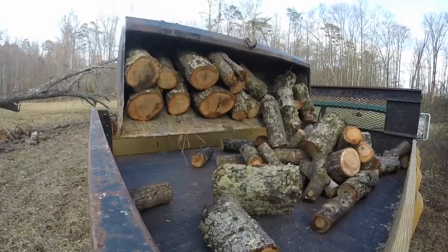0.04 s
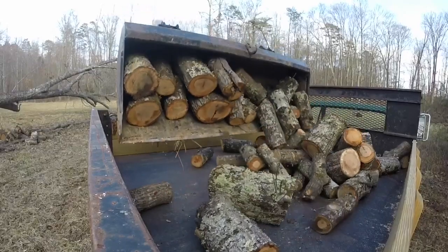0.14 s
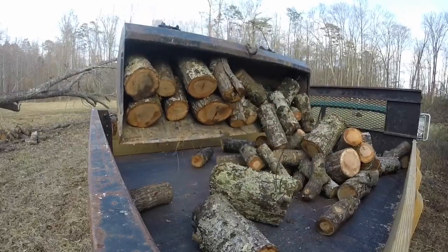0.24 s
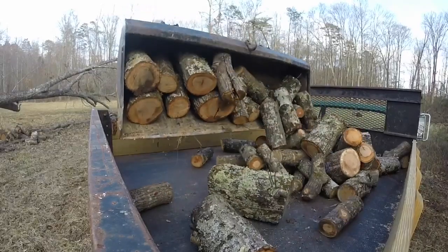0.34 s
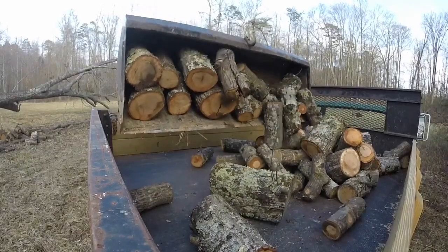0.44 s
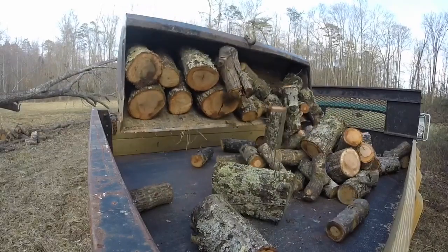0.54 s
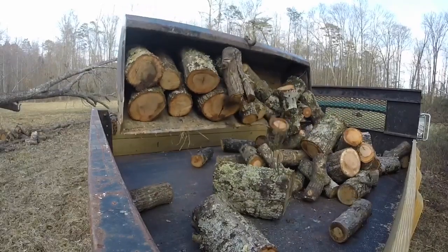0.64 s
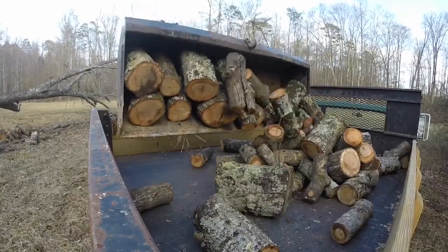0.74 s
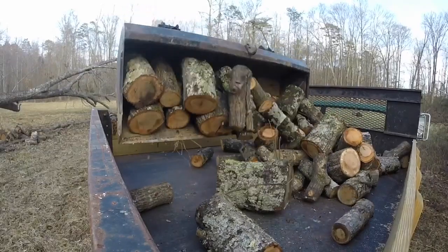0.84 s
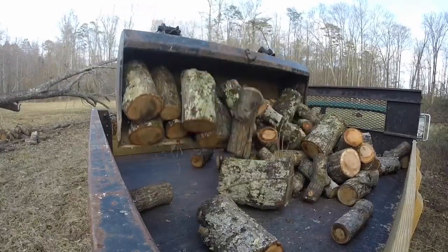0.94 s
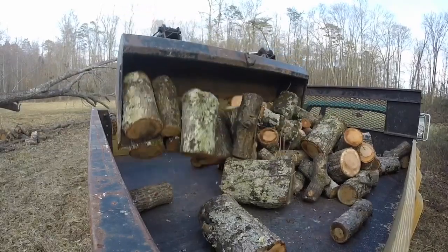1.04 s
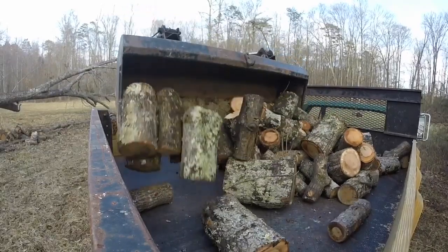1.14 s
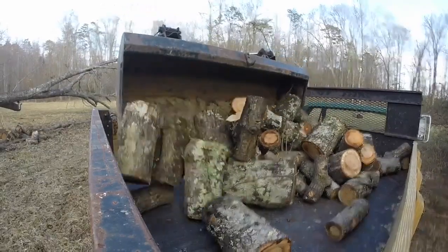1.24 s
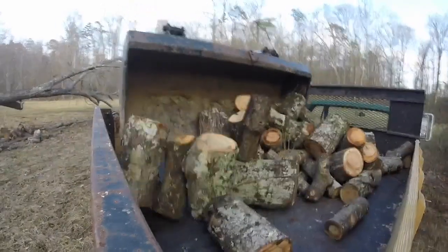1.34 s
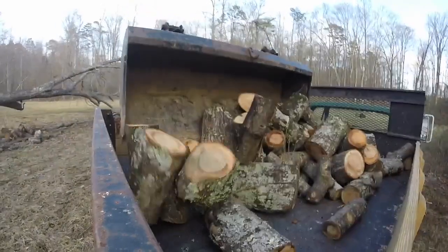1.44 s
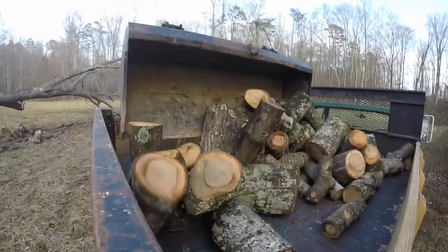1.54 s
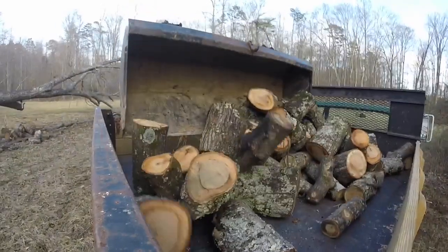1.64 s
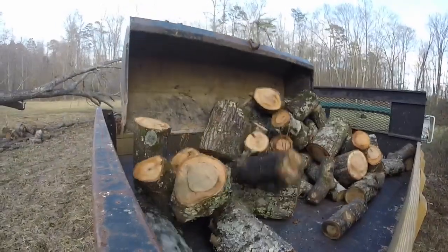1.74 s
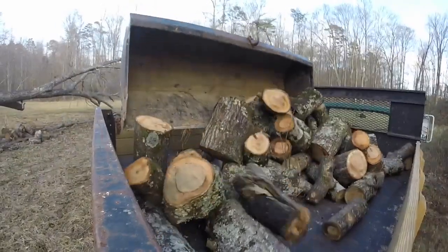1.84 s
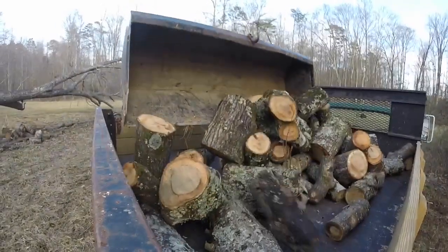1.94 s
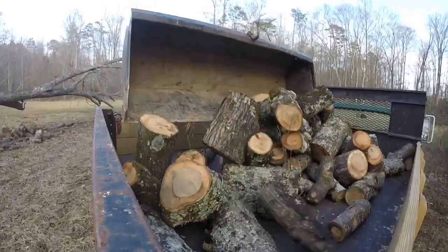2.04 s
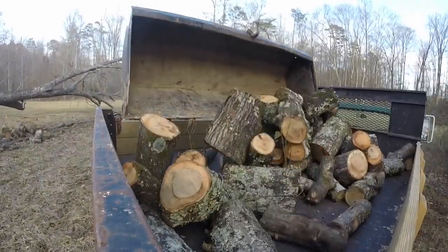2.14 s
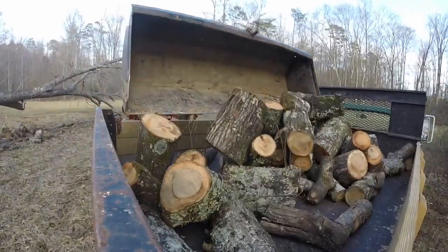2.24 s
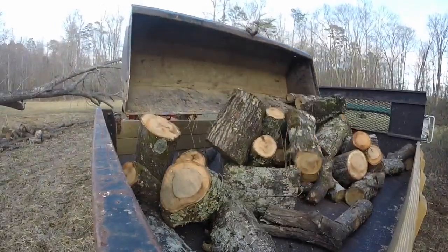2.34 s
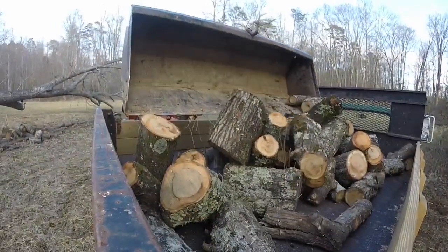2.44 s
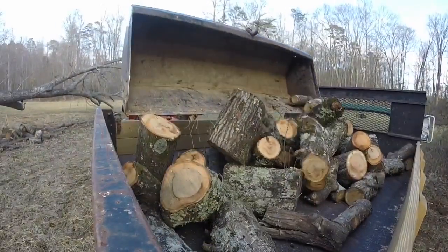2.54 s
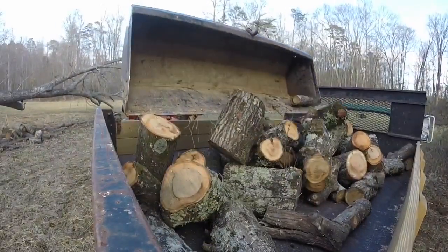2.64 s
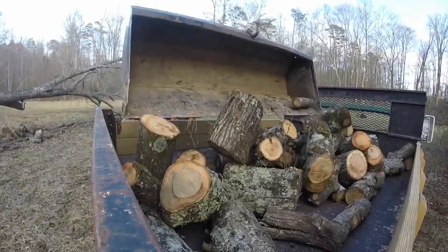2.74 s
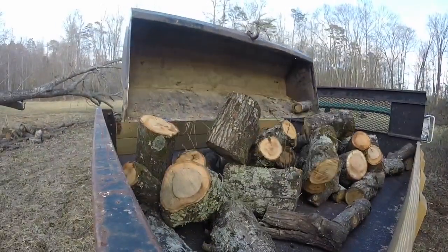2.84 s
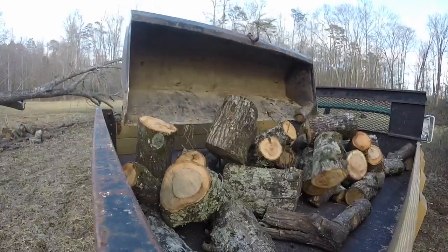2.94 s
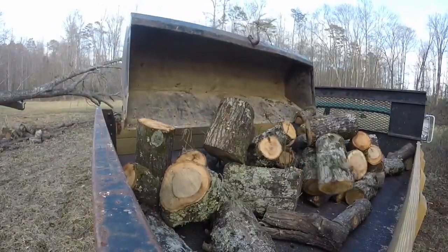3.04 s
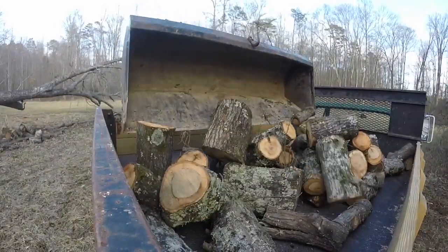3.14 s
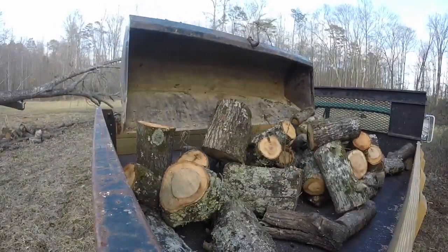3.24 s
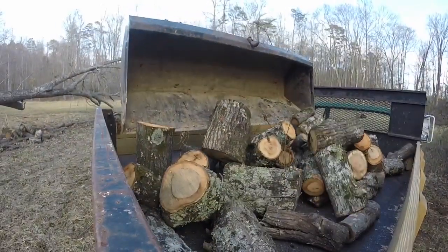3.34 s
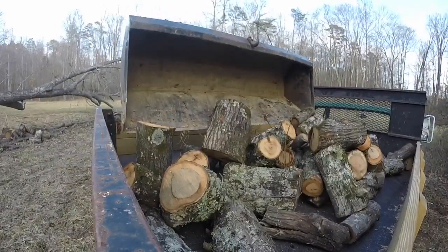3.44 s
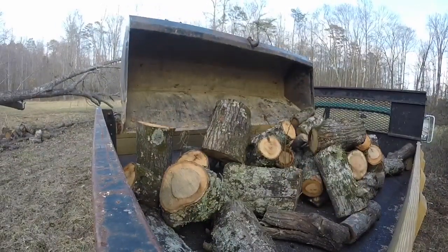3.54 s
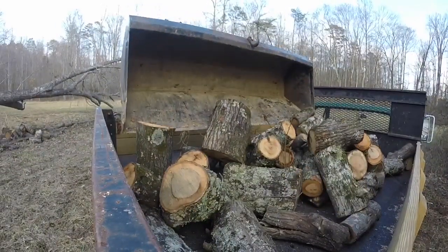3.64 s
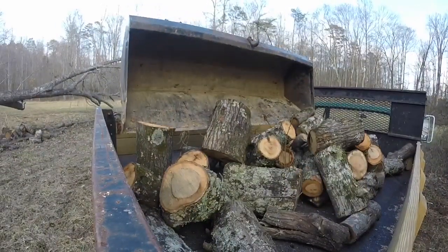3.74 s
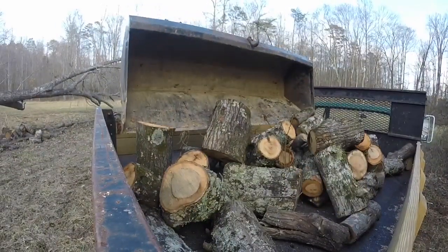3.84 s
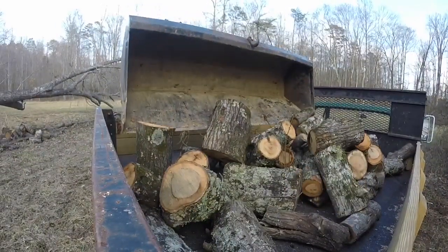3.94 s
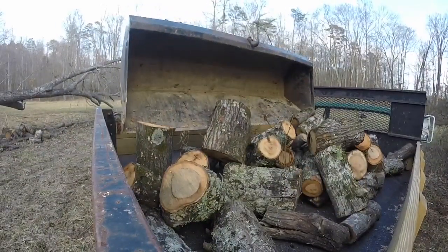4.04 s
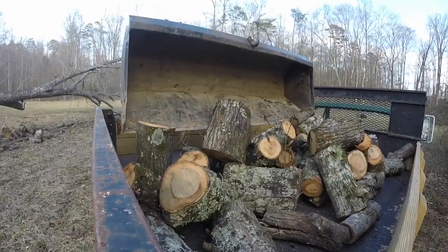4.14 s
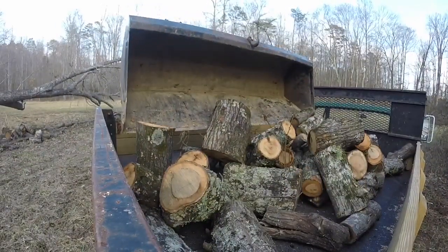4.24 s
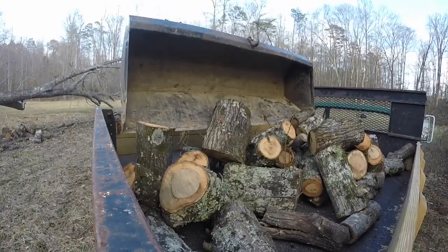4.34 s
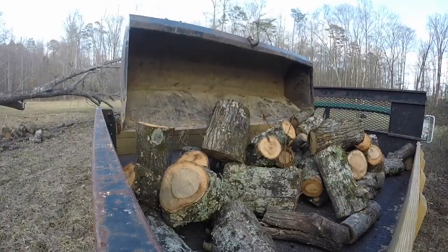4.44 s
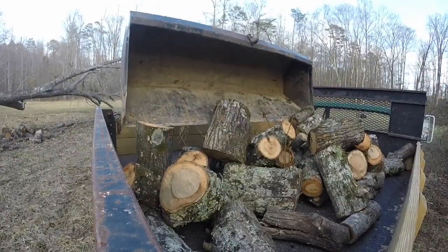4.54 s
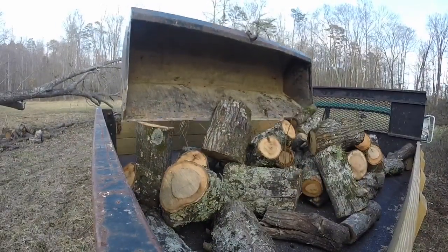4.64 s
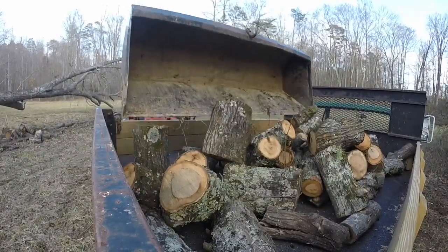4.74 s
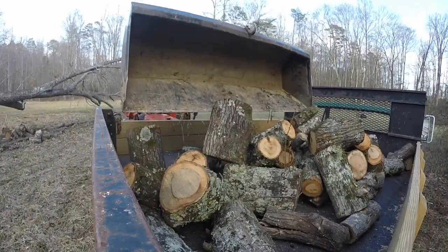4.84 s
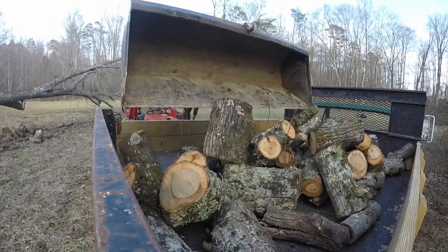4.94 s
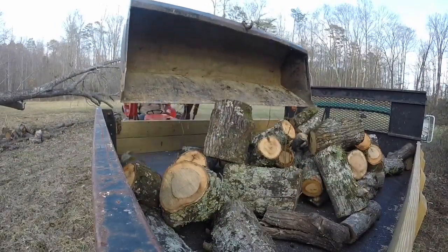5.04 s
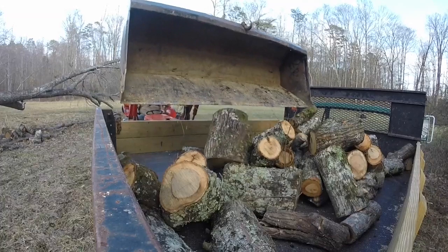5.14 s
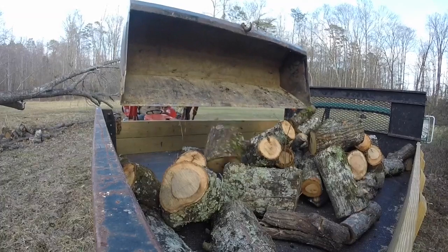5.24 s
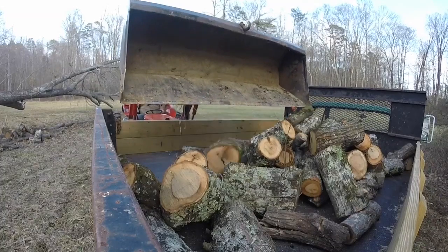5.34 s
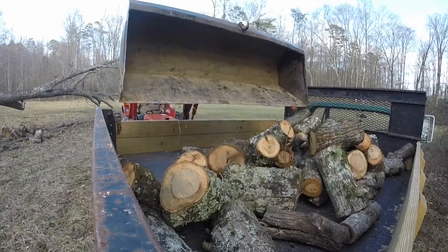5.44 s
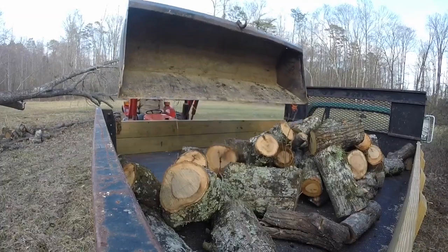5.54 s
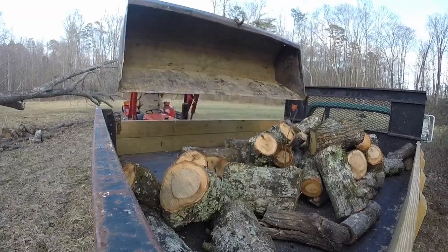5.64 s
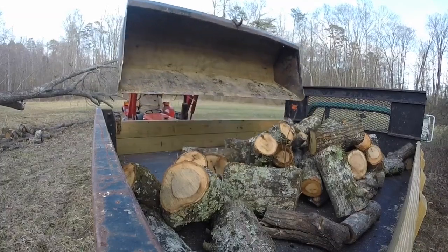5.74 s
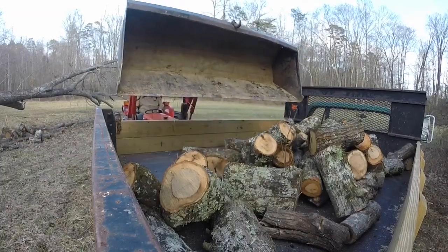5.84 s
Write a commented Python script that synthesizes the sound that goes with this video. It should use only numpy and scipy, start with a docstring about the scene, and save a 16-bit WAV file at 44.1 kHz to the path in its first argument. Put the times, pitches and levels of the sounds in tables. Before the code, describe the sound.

Firewood logs tumble from a steel loader bucket into a truck bed with heavy thuds, woody knocks and metallic booms over an idling diesel tractor.

```python
"""Firewood tipped into a truck bed

A tractor tips a loader bucket of firewood logs into a truck bed while its diesel runs throughout.
Logs thud on the bed and knock together, made from ringing tones and bursts of filtered noise.
The steel bucket booms and clanks; many small random contacts make the rumble, rattle and rustle.
The tractor is a stack of exhaust tones with noise for its clatter and hiss; a few last logs topple late."""
import sys
import numpy as np
from scipy import signal
from scipy.fft import rfft, irfft
from scipy.io import wavfile

SR = 44100
rng = np.random.default_rng(int(sys.argv[2]) if len(sys.argv) > 2 else 0)


def put_to_file(sound):
    """Save the sound as 16-bit audio at rate SR, in the file named by the first command-line argument."""
    columns = np.atleast_2d(sound).T  # one column per channel
    safe = np.clip(columns, -1, 1)
    whole_steps = np.round(safe * 32767)
    wavfile.write(sys.argv[1], SR, whole_steps.astype(np.int16))


N = 259308

# logs landing, mostly on the bed, a few inside the bucket; levels before the trims below: # start_s, thump_db,
# plank_crash_db, side_wall_shake_db, t60_s (time to fade by 60 dB)
LANDINGS = [(.013, -15, -20, -50, 0.23), (0.035, -12.5, -23, -45, .1), (.263, -14, -15.5, -59, 0.17),
            (.715, -12.5, -22.5, -53, .3), (.745, -21, -21, -50, 0.1), (.839, -7, -16.5, -65, 0.38),
            (.934, -9.5, -26.5, -60, 0.43), (1.247, -7, -12, -41, 0.22), (1.275, -7, -11.5, -15.5, 0.13),
            (1.367, -7, -11, -14, 0.2), (1.616, -12.5, -33, -40, 0.078), (1.68, -24, -23, -20.5, 0.18),
            (1.786, -6, -5, -24, 0.063), (2.015, -9.5, -13.5, -32, 0.1), (2.168, -9, -9, -23, 0.15),
            (2.654, -13, -40, -64, 0.12), (2.759, -13.5, -49, -65, 0.19), (2.844, -11.5, -31, -55, 0.25),
            (3.222, -7, -10.5, -21.5, .13), (5.075, -4.5, -21, -16, .18), (5.102, -9, -5, -15, 0.13),
            (5.363, -11.5, -17.5, -22.5, 0.26), (5.551, -9, -22.5, -28, 0.22), (5.664, -6, -18, -15, 0.15)]
# ringing tones of the bed's floor: pitch_hz, level_db
BED_MODES = [(58, -9.5), (84, 0), (108, -1.5), (135, -1), (166, -4.5), (200, -4.5), (252, -11), (325, -6.5),
             (431, -12.5)]
# colour of the crashing planks: frequency_hz, level_db (per Hz)
CRASH_COLOUR = [(100, -1.5), (300, 13.5), (450, 4.5), (600, 3.5), (850, 2.5), (1200, -5), (1600, -1.5),
                (2100, -10), (3500, -22), (7000, -39), (14000, -79)]


def thuds(thump_db=-5.0, crash_db=0.0, punch_db=2.5, punch_t60=0.041, lowest_hz=55):
    """A landing log pushes the floor's low modes; the planks answer with a punch and a longer crash."""
    times, low_db, plank_db, _, t60s = np.transpose(LANDINGS)
    crash_noise = coloured(rng.standard_normal(N), CRASH_COLOUR)
    crash = crash_noise * after_blows(times, plank_db + crash_db, t60s, rise_s=0.0045)
    punch_colour = [(130, 20.0), (300, -5), (600, -8.5), (1300, -7.0), (2000, -34), (5000, -52)]
    punch_noise = coloured(rng.standard_normal(N), punch_colour)
    punch = punch_noise * after_blows(times, plank_db + punch_db, punch_t60, rise_s=0.0023)
    out = crash + punch
    for s, db, t60 in zip(times, low_db, t60s):
        # the load lying on the floor detunes it from blow to blow
        modes = [(hz * (1 + 0.029 * rng.standard_normal()), mode_db, t60) for hz, mode_db in BED_MODES]
        add(out, s, from_db(db + thump_db) * struck(modes, rise_s=0.0016, scatter_db=3.5))
    # the thuds carry little deep bass
    return signal.sosfilt(signal.butter(2, lowest_hz, "high", fs=SR, output="sos"), out)


# log against log, levels before the trims below: start_s, level_db, pitch_hz, t60_s
KNOCKS = [(.013, -12.5, 1690, 0.11), (.066, -22, 1766, 0.13), (.119, -18, 1628, 0.09),
          (.266, -27, 1246, .14), (.351, -25, 1720, 0.071), (.591, -16.5, 861, 0.13),
          (.612, -18.5, 1045, .16), (.655, -21, 970, .1), (.75, -16.5, 2013, .13), (.853, -20, 1430, 0.072),
          (.995, -15.5, 1166, 0.066), (1.054, -12, 737, 0.11), (1.126, -17.5, 724, 0.12),
          (1.274, -7, 800, 0.06), (1.369, -13, 1326, .1), (1.674, -11, 1320, 0.043),
          (1.698, -12, 1566, 0.16), (1.786, -6, 1260, 0.027), (2.174, -14, 1167, .08),
          (2.332, -22, 1083, 0.13), (2.497, -28, 1194, .04), (2.658, -28, 1345, 0.11),
          (2.687, -25, 1013, 0.13), (2.782, -23.5, 1590, .15), (2.799, -21.5, 750, .16),
          (2.875, -28, 1560, .08), (3.194, -15.5, 1617, 0.081), (3.251, -15.5, 1600, .17),
          (3.477, -29, 964, 0.025), (3.934, -20.5, 1560, 0.039), (5.697, -13.5, 1498, 0.15)]
# ringing tones of a short log: pitch_ratio (multiple of its pitch), level_db
LOG_MODES = [(0.582, -5), (.81, -22.5), (0.999, 1.5), (1.17, -3.5), (1.432, -20), (1.848, -24), (2.3, -18),
             (2.9, -22.5)]
# the log's other end strikes a moment later, more softly
REBOUND_S, REBOUND_LOSS_DB = 0.024, 10.5


def knocks(wood_db=-5.5, bark_db=-5.0):
    """Each log strikes and rebounds, ringing briefly at its own pitch while its bark crunches."""
    rebounds = [(s + REBOUND_S, db - REBOUND_LOSS_DB, hz, t60) for s, db, hz, t60 in KNOCKS]
    touches = list(KNOCKS) + rebounds
    times, levels_db, _, t60s = np.transpose(touches)
    bark_colour = [(400, 13.5), (1700, 11.0), (2300, 1.0), (3200, -3), (5000, -21), (9000, -37)]
    bark = coloured(rng.standard_normal(N), bark_colour)
    out = bark * after_blows(times, levels_db + bark_db, t60s, rise_s=0.00043)
    for s, db, hz, t60 in touches:
        # higher tones fade sooner
        modes = [(hz * ratio, mode_db, t60 / ratio ** 0.5) for ratio, mode_db in LOG_MODES]
        add(out, s, from_db(db + wood_db) * struck(modes, rise_s=0.0004, scatter_db=1.0))
    return out


# heavy blows that set the bucket's shell booming, cut short where logs lean on it;
# levels before the trims below: start_s, level_db, t60_s, pitch_hz
BOOMS = [(.032, -14, 0.21, 107.6), (.189, -19, 0.44, 115.5), (0.503, -26, 0.19, 127),
         (.86, -13, .22, 116.3), (.936, -3, 0.44, 119.2), (1.03, -5, 0.32, 127), (1.072, -11, 0.36, 84.3),
         (1.19, -17, 0.14, 120), (1.278, -16, .28, 118.6), (2.18, -25.5, 1.8, 117.3),
         (2.385, -21.5, 1.3, 115), (2.98, -18, 0.53, 124), (3.033, -15.5, .67, 123.6),
         (3.228, -6, 0.2, 126.7), (3.313, -16.5, 0.24, 129.3), (4.55, -12.5, 0.41, 122.5),
         (4.598, -12, 0.96, 123.6), (4.801, -26, 1.15, 124)]
# deep tones of the shell: pitch_ratio (multiple of its pitch), level_db
SHELL_MODES = [(0.662, -10.5), (0.799, -10), (1.001, -1), (1.101, -8.5)]
# higher tones of the shell: pitch_ratio (multiple of its pitch), level_db
SHELL_OVERTONES = [(1.361, -9.5), (1.462, -1), (1.599, -14), (2.06, -25.5), (2.6, -16), (2.85, -20.5)]
# heavier logs land on a broader face, so the overtones lag behind the deep modes
OVERTONE_DB, OVERTONE_DB_PER_DB = -8, 0.5


def booms(boom_db=1.0):
    """Heavy blows make the bucket's whole shell boom; the heavier the blow, the deeper it sounds."""
    out = np.zeros(N)
    for s, db, t60, hz in BOOMS:
        overtone_db = OVERTONE_DB + OVERTONE_DB_PER_DB * db
        for modes, level_db in ((SHELL_MODES, db), (SHELL_OVERTONES, overtone_db)):
            for ratio, mode_db in modes:
                # logs and joints jostle against the shell, so each mode wavers
                mode = struck([(hz * ratio, mode_db, t60)], rise_s=0.0035, scatter_db=2.0)
                wavering = mode * waver(SR, per_s=30, spread_db=3.0)
                add(out, s, from_db(level_db + boom_db) * wavering)
    return out


# hard blows on the bucket's steel, ring level before the trims below: start_s, ring_db, crack_db
CLANKS = [(.266, -23, -29), (.752, -15, -21), (0.992, -19.5, -45), (1.367, -36, -16), (2.937, -19, -60),
          (3.195, -8.5, -17), (4.444, -17, -50), (4.505, -3.5, -15), (4.517, -5.5, -13),
          (4.661, -12, -28.5)]
# ringing tones of the bucket's steel: pitch_hz, level_db, t60_s
STEEL_MODES = [(528, -18, .2), (657, -14, .2), (957, -3, .22), (1017, -3, .16), (1116, -1, .24),
               (1174, -8, .2), (1320, -13, .15), (1653, -12, .07), (2239, -14, .08), (2476, -20, .08),
               (2627, -15, .08), (2805, -19, .07)]
# colour of the crack of steel on steel: frequency_hz, level_db (per Hz)
CRACK_COLOUR = [(300, -2.5), (1100, 14), (1800, 3.5), (2700, 10.5), (3800, -7.5), (5600, -3), (7000, -17),
                (9500, -30), (14000, -80.5)]


def clanks(clank_db=-5.5, crack_t60=0.12, jangle_db=-4.0, jangle_t60=0.3):
    """Hard blows clank in the bucket's steel and jangle the loader's joints."""
    times, ring_db, crack_db = np.transpose(CLANKS)
    jangle_colour = [(400, -7.5), (800, -9), (960, 4.5), (1150, 0.5), (1400, -18.5), (2500, -28.5),
                     (4000, -42.0)]
    jangle = coloured(rng.standard_normal(N), jangle_colour)
    out = jangle * after_blows(times, ring_db + jangle_db, jangle_t60, rise_s=0.0035)
    crack = coloured(rng.standard_normal(N), CRACK_COLOUR)
    out += crack * after_blows(times, crack_db, crack_t60, rise_s=0.0011)
    for s, db in zip(times, ring_db):
        add(out, s, from_db(db + clank_db) * struck(STEEL_MODES, rise_s=0.0015, scatter_db=1.5))
    return out


# colour of the rumbling logs: frequency_hz, level_db (per Hz)
RUMBLE_COLOUR = [(45, -28), (70, 1), (120, 3.5), (200, -3.5), (420, -2), (600, -11.5), (1000, -17),
                 (1600, -12.5), (2500, -39), (6000, -56)]
# after every heavy blow the logs tumble on and come to rest
TUMBLE_RISE_S, TUMBLE_T60_S, TUMBLE_DB_PER_DB = 0.022, 0.97, 0.55


def tumbling(tumble_db=-19.5, roll_db=0.5):
    """Rough bark bumps over steel and wood: many small dull contacts after blows and under rolling logs."""
    blows = [row[:2] for row in list(LANDINGS) + list(BOOMS)]
    times, levels_db = np.transpose(blows)
    settling_db = tumble_db + TUMBLE_DB_PER_DB * levels_db
    settling = after_blows(times, settling_db, TUMBLE_T60_S, TUMBLE_RISE_S)
    bumps = coloured(contacts(per_s=260, spread_db=4.5), RUMBLE_COLOUR)
    return np.hypot(settling, from_db(roll_db) * rolling()) * bumps


# heavy logs rolling along the bed's floor: start_s, length_s, side_wall_shake_db
ROLLS = [(1.313, 0.78, -27), (5.128, 0.15, -28.5), (5.764, 0.11, -38)]
ROLL_ATTACK_S, ROLL_RELEASE_T60_S = 0.038, 0.66


def rolling():
    """How hard rolling logs shake the bed: each roll builds up, holds and fades."""
    t = np.arange(N) / SR
    shake = np.zeros(N)
    for s, length, db in ROLLS:
        attack = np.clip((t - s) / ROLL_ATTACK_S, 0, 1)
        after_end = np.maximum(t - s - length, 0)
        shake += from_db(db) * attack * np.exp(-np.log(1000) * after_end / ROLL_RELEASE_T60_S)
    return shake


# buzzing side panels: pitch_hz, level_db, t60_s
PANEL_MODES = [(425.6, -2, 0.083), (630, -7.5, .065), (727, 0.5, 0.025), (836, -5.5, 0.064),
               (960, -2, 0.08), (1117, -6, 0.084), (1338, 0.5, 0.034), (1416, -3.5, 0.067),
               (1504, -2, 0.067), (1591, -2.5, 0.1), (1665, -3.5, 0.072), (1812, -4, 0.052),
               (1938, -10.5, 0.11), (2255, -17, 0.026), (2600, -9, .02)]
# the sharpest ticks of the loose fittings, levels before the trim below: start_s, level_db
TICKS = [(.03, -15), (1.141, -22.5), (1.304, -6.5), (1.338, -7), (1.356, -5.5), (1.428, -11), (1.675, -14),
         (1.881, -10), (2.211, -23), (3.26, -20.5), (5.116, -1.5), (5.132, -6), (5.15, -7), (5.70, -20)]
# the side walls take a moment to swing up after a landing, then settle
SHAKE_RISE_S, SHAKE_T60_S = 0.015, 0.42
TICKING_DB_PER_DB = 1.48  # loose fittings need a hard shake: they grow faster than the panels' buzz


def rattle(buzz_db=3.5, ticking_db=1.5, tick_db=-12.0, scrape_db=-2.0):
    """Shaken by landings and rolling logs, panels buzz and loose fittings tick; bark scrapes the floor."""
    times, _, _, shake_db, _ = np.transpose(LANDINGS)
    shake = np.hypot(after_blows(times, shake_db, SHAKE_T60_S, SHAKE_RISE_S), rolling())
    hard_shake = shake ** TICKING_DB_PER_DB
    buzz = shake * rms_one(ring(contacts(per_s=330, spread_db=1), PANEL_MODES, scatter_db=0.5))
    small_ticks = ticked(contacts(per_s=190, spread_db=5.0), click_db=1.0, click_t60=0.021)
    ticking = hard_shake * rms_one(small_ticks)
    bark_colour = [(1800, 8.5), (3000, 9.5), (4200, 4.0), (6300, -5), (7300, -22.5), (11000, -42.0)]
    bark = coloured(rng.standard_normal(N), bark_colour)
    scrape = hard_shake * bark * waver(N, per_s=190, spread_db=4.0)
    sharp_clicks = np.zeros(N)
    for s, db in TICKS:
        add(sharp_clicks, s, from_db([db + tick_db]))
    sharp_ticks = ticked(sharp_clicks, click_db=2.0, click_t60=0.017)
    shaken = from_db(buzz_db) * buzz + from_db(ticking_db) * ticking + from_db(scrape_db) * scrape
    return shaken + sharp_ticks


# ringing tones of the loose fittings: pitch_hz, level_db, t60_s
FITTING_MODES = [(2593, -10.5, 0.052), (3459, -10.5, .045), (3850, -11, 0.036), (3980, -0.5, 0.0083),
                 (4647, -4.5, 0.026), (5456, -3, 0.027), (5700, -10, 0.045), (6300, -6, .01),
                 (7800, -18, .02), (10100, -26, 0.029), (10500, -31.5, 0.021)]
# colour of a tick's click: frequency_hz, level_db (per Hz)
TICK_COLOUR = [(1500, -7.5), (2300, -3.5), (3000, -2.5), (3700, 7.5), (5000, -0.5), (5700, 5.5), (6500, -5),
               (7200, -24), (9000, -16), (10900, -11.5), (11900, -44), (15000, -53)]


def ticked(clicks, click_db, click_t60):
    """Each tick is a short broad click plus the ring of the fittings."""
    decay = np.exp(-2 * np.log(1000) / (click_t60 * SR))  # energy kept from sample to sample
    energy = signal.lfilter([1], [1, -decay], clicks ** 2 + 1e-18)
    click = np.sqrt(energy) * coloured(rng.standard_normal(N), TICK_COLOUR)
    return ring(clicks, FITTING_MODES, scatter_db=4.0) + from_db(click_db) * click


# faint, crisp rustles of loose bark: start_s, level_db
RUSTLES = [(.42, -45), (2.33, -52), (3.77, -47), (4.135, -46), (4.35, -46.5)]
# colour of the rustles: frequency_hz, level_db (per Hz)
RUSTLE_COLOUR = [(2500, -10), (4500, 7), (7500, 0.5), (11000, -16), (14000, -20)]


def rustles(rustle_t60=0.22):
    """Flakes of bark slip off the pile: bursts of many tiny random contacts."""
    times, levels_db = np.transpose(RUSTLES)
    flakes = coloured(contacts(per_s=570, spread_db=1), RUSTLE_COLOUR)
    return flakes * after_blows(times, levels_db, rustle_t60, rise_s=0.0033)


# pace of the tractor's engine: time_s, firings_per_s
ENGINE_SPEED = [(0, 19.6), (3.4, 19.1), (4.4, 19.1), (5.88, 19.5)]
# how loud the engine's clatter is; exhaust and hiss partly follow its swings: time_s, level_db
ENGINE_LEVEL = [(0, -27), (.4, -31.5), (.75, -23), (1.2, -34.5), (1.5, -28), (2.55, -35), (2.9, -30.5),
                (3.45, -31.5), (3.8, -27), (4.4, -26.5), (4.6, -30.5), (5.0, -26.5), (5.3, -33.5),
                (5.88, -29)]
# exhaust tones: firing_rate_ratio (multiple of the firing rate), level_db (before the trim below)
EXHAUST = [(1, -32), (2, -6.5), (3, -5), (4, -5.5), (5, -9.5), (6, -26.5), (7, -30), (9, -9)]
# colour of the engine clatter: frequency_hz, level_db (per Hz)
CLATTER_COLOUR = [(40, -14.5), (90, 9.5), (160, 2.5), (230, -2), (400, 1.5), (510, -2.5), (680, 3),
                  (1000, 4.5), (1250, 2), (1500, -5), (2000, -14.5), (2800, -20), (4000, -36),
                  (8000, -52.5)]
# colour of the hydraulic hiss: frequency_hz, level_db (per Hz)
HISS_COLOUR = [(2500, 14), (4000, -6.5), (5600, 5), (7000, -3.5), (10000, -14), (12500, -22.5),
               (15500, -21.5)]
# hiss of the hydraulic valve while the bucket tips: time_s, level_db
VALVE = [(.2, -52), (.45, -48.5), (1.0, -40.5), (1.18, -49.5), (1.3, -56)]


def tractor(throb=0.075, exhaust_db=-30.0, exhaust_follow=0.92, firing_at_s=4.02,
            hiss_db=-52.5, hiss_follow=0.85):
    """Deep exhaust beats, mechanical clatter that swells with each firing, and the hiss of the hydraulics."""
    firings_per_s, = in_time(ENGINE_SPEED)
    engine_db, = in_time(ENGINE_LEVEL)
    valve_db, = in_time(VALVE, outside=-np.inf)
    swing_db = engine_db - engine_db.mean()
    firings = np.cumsum(firings_per_s) / SR
    phase = 2 * np.pi * (firings - firings[round(firing_at_s * SR)])
    beats = -sum(from_db(db) * np.cos(round(ratio) * phase) for ratio, db in EXHAUST)
    exhaust = from_db(exhaust_db + exhaust_follow * swing_db) * beats
    clatter = coloured(rng.standard_normal(N), CLATTER_COLOUR) * (1 + throb * np.cos(phase))
    hiss = coloured(rng.standard_normal(N), HISS_COLOUR) * waver(N, per_s=23, spread_db=3.0)
    hiss_gain = np.hypot(from_db(hiss_db + hiss_follow * swing_db), from_db(valve_db))
    return exhaust + from_db(engine_db) * clatter + hiss_gain * hiss


def from_db(db):
    """Decibels to gain."""
    return 10 ** (np.asarray(db) / 20)


def rms_one(x):
    """Scale to an rms (average strength) of 1."""
    return x / np.sqrt(np.mean(x ** 2) + 1e-20)


def in_time(rows, outside=None):
    """Each column of a curve at every sample, with straight lines between its points."""
    s, *columns = np.transpose(rows)
    t = np.arange(N) / SR
    return [np.interp(t, s, column, outside, outside) for column in columns]


def add(track, s, sound):
    """Mix a sound in from time s."""
    start = max(0, round(s * SR))
    track[start:start + len(sound)] += sound[:N - start]


def coloured(x, spectrum):
    """Give a steady noise a spectrum, fading out beyond its end points; rms 1."""
    hz, level_db = np.transpose(spectrum)
    bins = np.maximum(np.arange(len(x) // 2 + 1) * SR / len(x), 1)
    low_end = 1 + (hz[0] / bins / 2 ** 0.5) ** 6
    high_end = 1 + (bins / hz[-1] / 2 ** 0.5) ** 8
    gain = from_db(np.interp(np.log(bins), np.log(hz), level_db)) / np.sqrt(low_end * high_end)
    return rms_one(irfft(rfft(x) * gain, len(x)))


def waver(size, per_s, spread_db):
    """A gain that wanders at random, aiming at a new level per_s times a second."""
    knots = np.arange(size) * per_s / SR
    levels = rng.standard_normal(N // 100)
    return from_db(spread_db * np.interp(knots, np.arange(N // 100), levels))


def dying(t60, rise_s):
    """One second of envelope: a quick rise and an exponential fall."""
    t = np.arange(SR) / SR
    return (1 - np.exp(-t / rise_s)) * np.exp(-np.log(1000) * t / t60)


def after_blows(times, levels_db, t60, rise_s):
    """Envelope of a run of blows: each rises and dies, and their energies add."""
    energy = np.zeros(N)
    for s, db, own_t60 in np.broadcast(times, levels_db, t60):
        add(energy, s, (from_db(db) * dying(own_t60, rise_s)) ** 2)
    return np.sqrt(energy)


def struck(modes, rise_s, scatter_db):
    """A struck body rings in several dying tones; the point of contact changes their strengths."""
    t = np.arange(SR) / SR
    out = np.zeros(SR)
    for hz, db, t60 in modes:
        strength = from_db(db + scatter_db * rng.standard_normal())
        out += strength * np.sin(2 * np.pi * hz * t) * dying(t60, rise_s)
    return out


def contacts(per_s, spread_db):
    """Clicks at random moments, of uneven size and random sign."""
    gaps = rng.gamma(1.5, 1 / 1.5, N // 40)  # average gap 1, divided by per_s below
    at = (np.cumsum(gaps) * SR / per_s).astype(int)
    sizes = from_db(spread_db * rng.uniform(-1, 1, len(at))) * rng.choice([-1, 1], len(at))
    clicks = np.zeros(N)
    clicks[at[at < N]] = sizes[at < N]
    return clicks


def ring(clicks, modes, scatter_db):
    """Clicks set off dying tones, one resonant filter each; every click hits each with a new strength."""
    out, at = np.zeros(N), np.flatnonzero(clicks)
    for hz, db, t60 in modes:
        strength = from_db(db + scatter_db * rng.standard_normal(len(at)))
        drive = np.full(N, 1e-18)
        drive[at] = clicks[at] * strength * rng.choice([-1, 1], len(at))
        r, w = np.exp(-np.log(1000) / (t60 * SR)), 2 * np.pi * hz / SR
        out += signal.lfilter([0, np.sin(w)], [1, -2 * r * np.cos(w), r * r], drive)
    return out


def scene():
    """All the sounds together, eased in over a few milliseconds."""
    ease_in = np.minimum(np.arange(N) / (0.008 * SR), 1)
    logs = thuds() + knocks() + tumbling() + rustles()
    steel = booms() + clanks() + rattle()
    return (ease_in * (logs + steel + tractor()))[None]


CUTOFF_HZ = 15600


def record(dry):
    """The microphone loses the deepest bass and the highest treble, peaks are rounded, the top is cut."""
    x = signal.sosfilt(signal.butter(2, 16, "high", fs=SR, output="sos"), dry)
    rounded = 1.28 * np.tanh(x / 1.279)
    x = signal.sosfilt(signal.butter(5, 12000, "low", fs=SR, output="sos"), rounded)
    return signal.sosfilt(signal.cheby2(12, 70, CUTOFF_HZ, fs=SR, output="sos"), x)


dry = scene()
out = record(dry)
put_to_file(out)
```